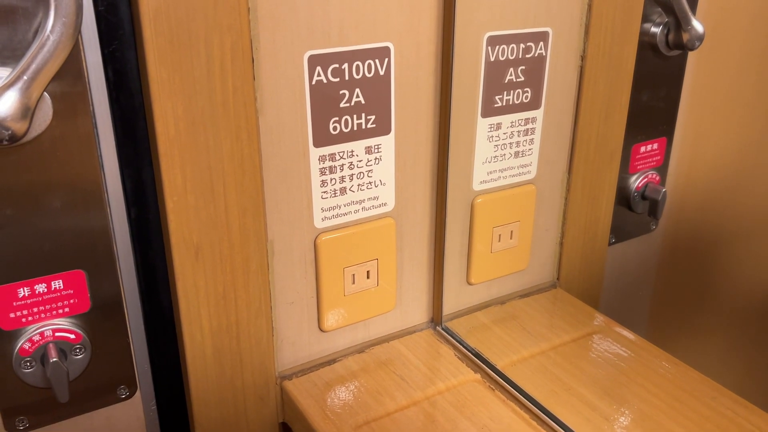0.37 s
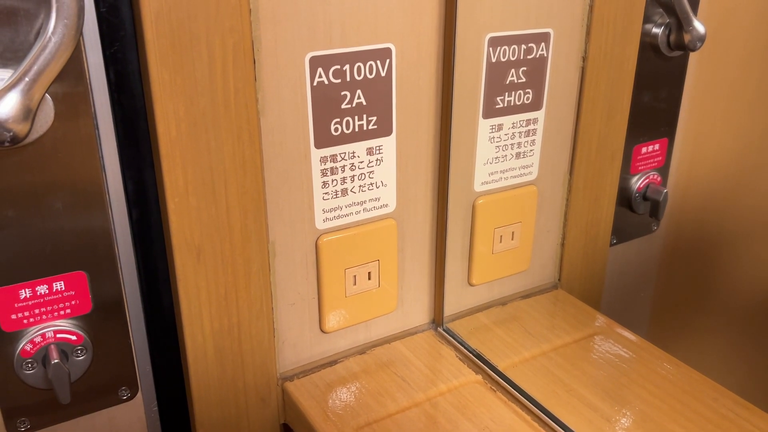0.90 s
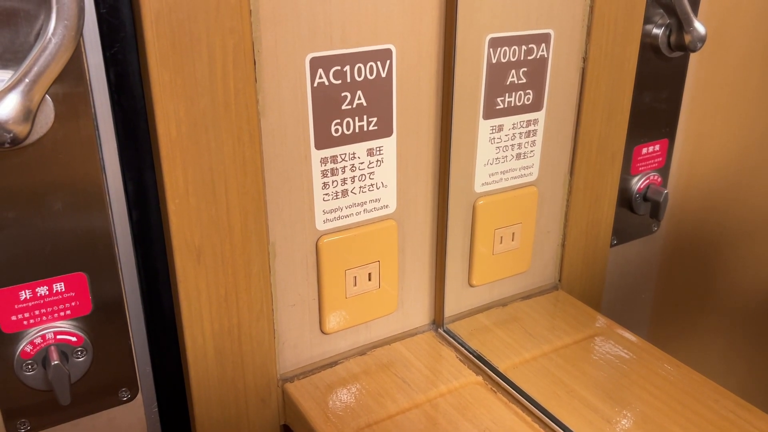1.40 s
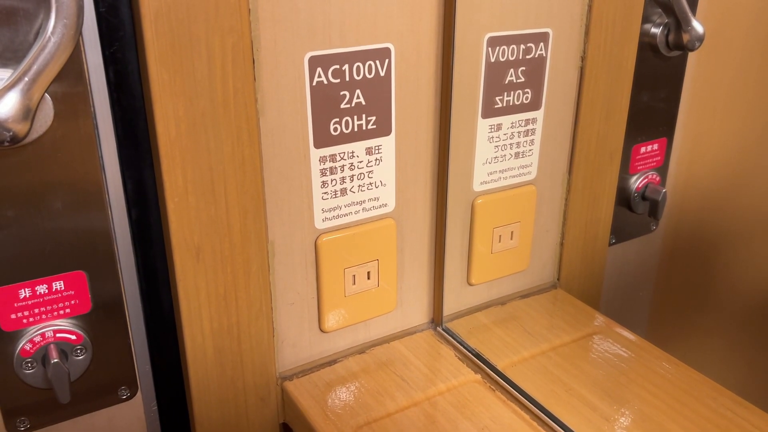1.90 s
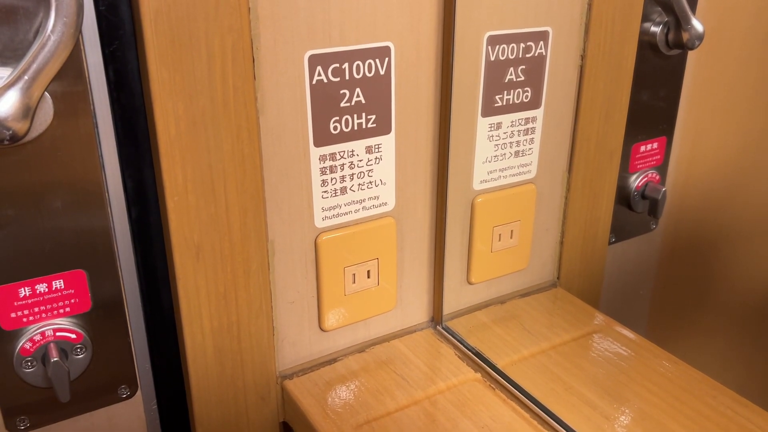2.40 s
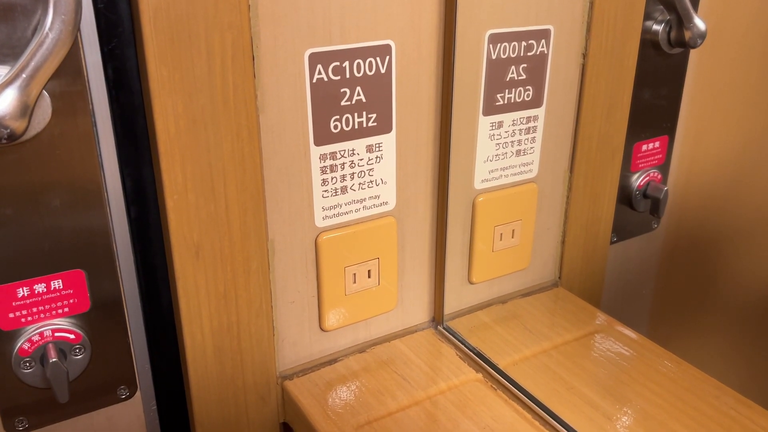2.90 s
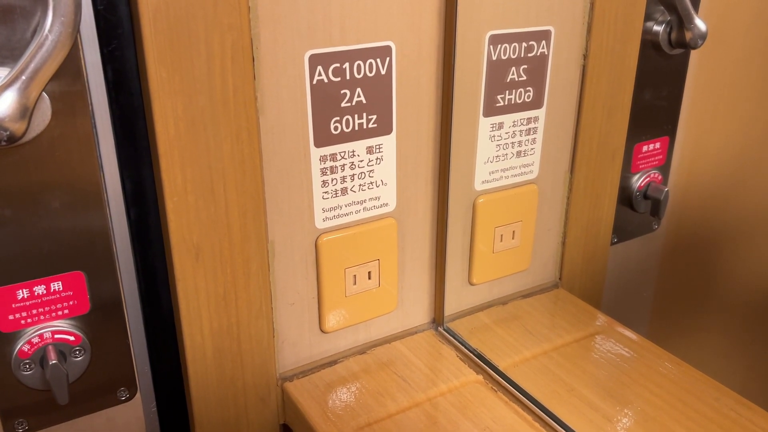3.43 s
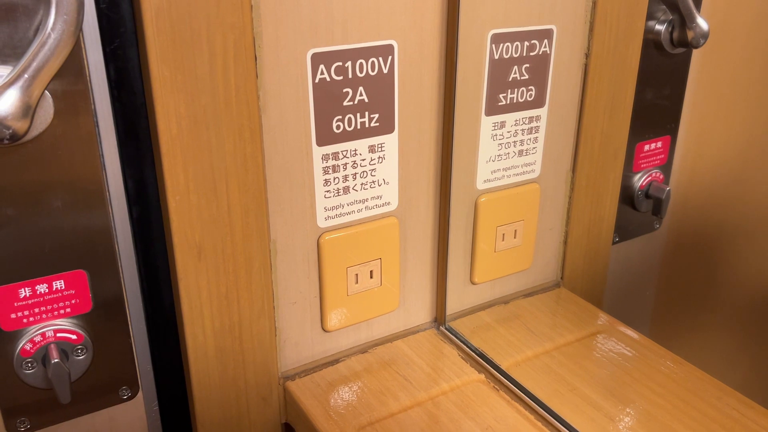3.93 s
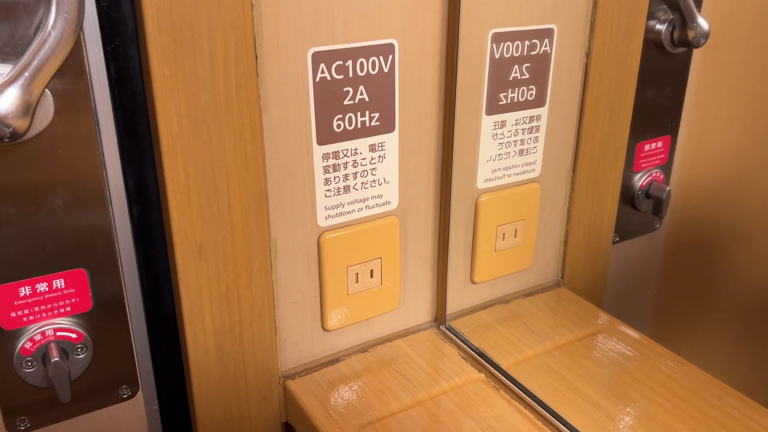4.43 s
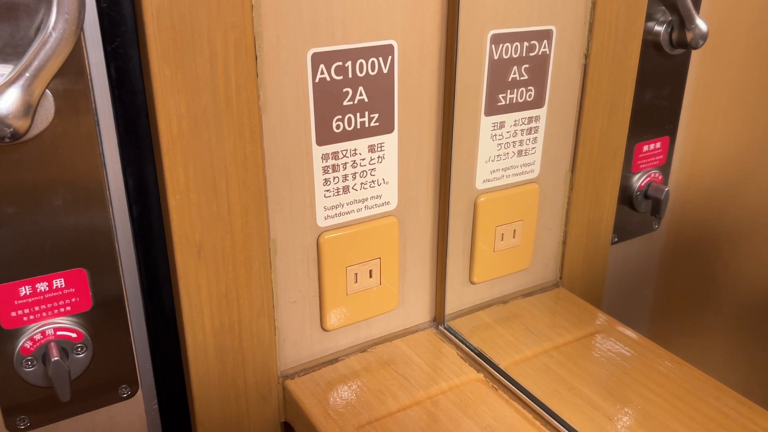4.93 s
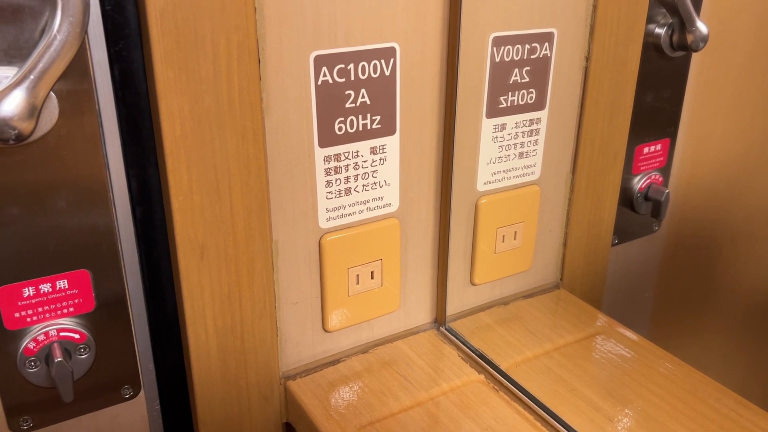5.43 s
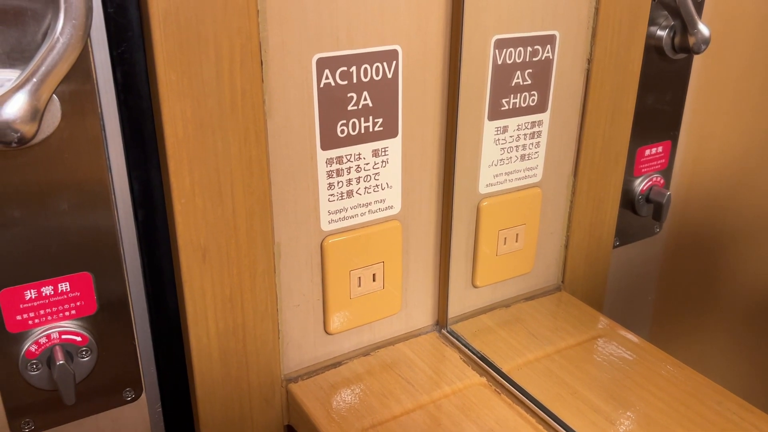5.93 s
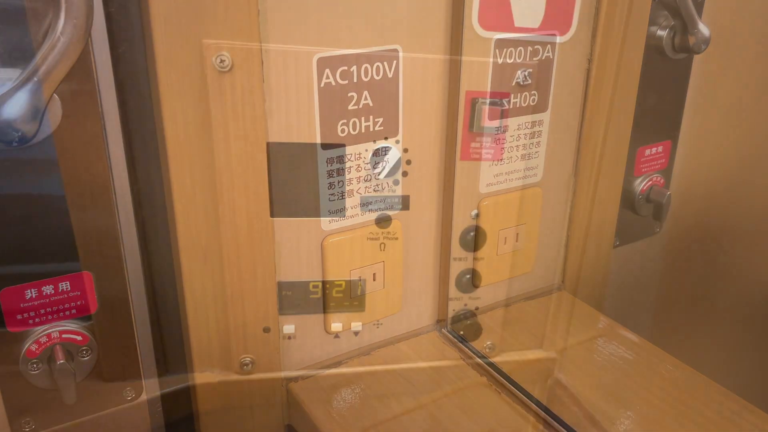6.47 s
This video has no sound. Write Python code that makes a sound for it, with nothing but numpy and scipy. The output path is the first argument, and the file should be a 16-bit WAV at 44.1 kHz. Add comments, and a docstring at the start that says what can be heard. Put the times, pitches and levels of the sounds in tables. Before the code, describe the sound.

A continuous train interior ambience, close and boxy in stereo: bassy rolling rumble swelling and sinking irregularly, a soft patchy rush of ventilation, a mid-pitched fan note leaning right, and very faint high machine tones. Nothing else happens for about six seconds; then the rumble suddenly becomes louder and rougher, the air changes colour, and it stops.

```python
"""Train compartment, rolling.

Inside a small wood-panelled compartment of a moving train, heard by two close microphone ports.
Rolling wheels shake the floor into a low rumble: shaped noise in three ranges, each with its own level.
Air rushes from the vent as patchy noise; a fan sings one wavering sine and an electric unit a thin
steady one, over fainter wandering tones. Near the end a heavier rumble and rush are abruptly mixed in."""
import sys
import numpy as np
from scipy import signal
from scipy.fft import rfft, irfft, next_fast_len
from scipy.io import wavfile
from scipy.ndimage import uniform_filter1d

SR = 44100
rng = np.random.default_rng(int(sys.argv[2]) if len(sys.argv) > 2 else 0)


def level_to_linear(level):
    """Convert decibel levels to linear amplitude factors, elementwise."""
    exponent = np.asarray(level, float) / 20
    return 10 ** exponent


def output_pcm(signal):
    """Save a mono or channel-first signal as 16-bit PCM at the path in sys.argv[1].

    Samples are clipped to [-1, 1] before scaling.
    """
    pcm = np.clip(np.atleast_2d(signal).T, -1, 1) * 32767
    wavfile.write(sys.argv[1], SR, np.round(pcm).astype(np.int16))


N = 290178
SIZE = next_fast_len(N + SR // 2)  # transform length, with room for the reverberation
HZ = np.maximum(np.arange(SIZE // 2 + 1) * SR / SIZE, 1)

# uneven level of the rolling rumble in three ranges:
# (time [s], low range [dB], middle range [dB], upper range [dB])
ROLLING_LEVELS = [(0, -26.5, -37.5, -40.5), (.25, -32, -39.5, -43), (.45, -32.5, -33, -40.5),
                  (.8, -30, -36, -42), (1.15, -34, -35, -42), (1.38, -29, -31, -41.5),
                  (1.52, -35, -33, -43.5), (1.7, -33.5, -37, -41.5), (1.92, -31, -31.5, -42.5),
                  (2.2, -31, -35.5, -43), (2.4, -30.5, -40, -41.5), (2.58, -28.5, -31, -41.5),
                  (2.77, -29, -35, -44), (2.92, -29.5, -37.5, -41), (3.2, -31.5, -32.5, -42),
                  (3.5, -31, -36.5, -43), (3.8, -29.5, -32.5, -42.5), (4.0, -32, -33.5, -42),
                  (4.2, -32, -37, -42), (4.45, -27, -35.5, -42.5), (4.6, -35.5, -39.5, -41),
                  (4.9, -32, -31.5, -43.5), (5.15, -34.5, -38, -41.5), (5.35, -29.5, -38, -42.5),
                  (5.6, -32.5, -36, -43.5), (5.9, -29, -33, -43), (6.02, -32.5, -36.5, -42.5),
                  (6.58, -35, -34.5, -46)]
# colour of the rolling rumble: (frequency [Hz], relative density [dB per Hz])
ROLLING_SPECTRUM = [(12, -39.5), (20, -21), (28, -11), (40, -2.5), (62, 1), (100, -4), (140, -14.5),
                    (200, -19.5), (300, -30), (500, -47), (900, -76.5)]
# balance of the ports for rolling and vent: (frequency [Hz], left minus right [dB])
PORT_BALANCE = [(25, -1.8), (60, -2.3), (115, -2.2), (200, -1.5), (380, -0.8), (700, -.3), (1290, 0),
                (2000, -3.7), (4400, -1), (5500, 3), (7000, -2), (8200, 0.5), (10000, 1), (15000, 0.5)]


def rolling(response):
    """The rolling wheels' low rumble as shaped noise, its upper range the least even."""
    return rumble(in_time(ROLLING_LEVELS), ROLLING_SPECTRUM, response, PORT_BALANCE,
                  steady=[.9, .8, .3], window_s=.045)


# uneven level of the heavier rumble in three ranges:
# (time [s], low range [dB], middle range [dB], upper range [dB])
HEAVY_LEVELS = [(6.05, -24, -32, -39), (6.11, -25.5, -25, -36), (6.16, -26, -32.5, -35.5),
                (6.23, -22, -23, -40), (6.284, -33, -28, -37.5), (6.316, -19, -27.5, -37.5),
                (6.348, -22.5, -19.5, -32.5), (6.378, -26.5, -33, -39.5), (6.41, -22, -20, -36),
                (6.435, -26, -33, -44.5), (6.466, -35, -32, -34), (6.51, -26, -24, -37.5),
                (6.55, -21.5, -25.5, -38.5), (6.58, -21, -23, -42)]
# colour of the heavier rumble: (frequency [Hz], relative density [dB per Hz])
HEAVY_SPECTRUM = [(12, -53), (22, -20), (32, 2.5), (42, 2.5), (60, -3), (100, -1.5), (160, -12), (220, -23),
                  (300, -28.5), (430, -36.5), (600, -57), (900, -73)]
# balance of the ports for the heavier rumble and rush: (frequency [Hz], left minus right [dB])
HEAVY_BALANCE = [(40, 0), (110, -.3), (150, -3), (260, -5), (400, -1), (550, 3), (900, 0), (1800, -3),
                 (4400, 0), (6500, 4), (7600, 0), (8600, 8), (10000, 0)]


def heavy_rumble(response):
    """A second, heavier-sounding rumble of shaped noise, mixed in abruptly near the end."""
    noise = rumble(in_time(HEAVY_LEVELS), HEAVY_SPECTRUM, response, HEAVY_BALANCE,
                   steady=[.9, .9, .8], window_s=.04)
    return joining()[0] * noise


def rumble(levels_db, spectrum, response, balance, steady, window_s):
    """Three ranges of low noise, each with a level of its own and steadier than free noise."""
    part = np.searchsorted([75, 135], HZ)  # Hz where the middle and upper ranges begin
    span = round(window_s * SR)
    out = 0
    for k, level_db in enumerate(levels_db):
        noise = rfft(rng.standard_normal(SIZE))
        band = unit(heard(noise, spectrum, response, balance) * (part == k))
        power = band.mean(axis=0) ** 2
        swell = uniform_filter1d(uniform_filter1d(power, span), span)
        band = band * (swell + 0.17) ** (-steady[k] / 2)  # chance swells are partly levelled
        out = out + level_to_linear(level_db) * band / band.mean(axis=0).std()
    return out


# colour of the vent air: (frequency [Hz], relative density [dB per Hz])
VENT_SPECTRUM = [(200, -16.5), (400, -2), (640, -7.5), (900, -7), (1200, -3), (1700, -5.5), (1800, -8),
                 (2300, -12), (3500, -14), (4500, -18), (5000, -20), (6800, -28), (7300, -35), (15000, -36)]


def vent(response):
    """Turbulent air rushes from the vent as broad shaped noise."""
    return rush(-52.5, VENT_SPECTRUM, response, PORT_BALANCE)


# colour of the heavier rush: (frequency [Hz], relative density [dB per Hz])
HEAVY_RUSH_SPECTRUM = [(200, -4), (450, -1.5), (650, -1), (1200, -0.5), (2200, -3.5), (2800, 0), (3300, -7),
                       (4200, -11), (6500, -18), (7600, -41.5), (8600, -21), (9600, -20), (11000, -39.5),
                       (15000, -34)]


def heavy_rush(response):
    """A second, differently coloured air noise joins with the heavier rumble."""
    return joining()[0] * rush(-56, HEAVY_RUSH_SPECTRUM, response, HEAVY_BALANCE)


def rush(level_db, spectrum, response, balance):
    """Air noise that breathes a little; level_db is set ahead of the patchiness."""
    air = heard(rfft(rng.standard_normal(SIZE)), spectrum, response, balance)
    breath_db = .5 * drift(7.0)
    return level_to_linear(level_db + breath_db) * patchy(unit(air))


# how patchy the air is: (frequency [Hz], share of the swells added again [0-1])
PATCHINESS = [(500, 0.07), (1200, 0.04), (2200, 0.2), (4500, 0.5), (7000, .28), (13000, .2)]


def patchy(air):
    """Each narrow range's own swells and sinkings are deepened, alike at both ports."""
    patch_s = .045
    hz, s, parts = signal.stft(air, SR, nperseg=1024, noverlap=768)
    power = np.abs(parts.mean(axis=0)) ** 2 + 1e-20
    swell = uniform_filter1d(power, round(patch_s / (s[1] - s[0])), axis=1)
    swell = swell / power.mean(axis=1, keepdims=True)
    at, share = np.transpose(PATCHINESS)
    share = np.interp(np.log(hz + 1), np.log(at), share)
    deepened = parts * swell ** (share[:, None] / 2)
    return signal.istft(deepened, SR, nperseg=1024, noverlap=768)[1][:, :N]


# fan speed heard as its note: (time [s], pitch [Hz])
FAN_NOTE = [(0, 693.3), (.37, 695.3), (1.2, 695), (2.35, 692), (2.75, 694), (3.17, 699), (3.5, 699.4),
            (3.9, 698.3), (4.32, 697.2), (4.7, 698), (5.2, 698), (5.52, 696), (5.75, 699.4), (6.2, 698.5),
            (6.58, 697.5)]
# the fan note swells and sinks: (time [s], level change [dB])
FAN_SWELLS = [(0, 0), (.5, 2.5), (1.2, 0.5), (1.8, 1.5), (2.4, -1.5), (3.4, 1.5), (3.9, 1.5), (4.5, 0.5),
              (5.25, 1), (5.55, 0), (5.85, 0.5), (6.58, 3)]


def fan():
    """The blade note wanders a little in pitch and flutters in the air stream."""
    steady_hz = in_time(FAN_NOTE)[0]
    hz = steady_hz + .5 * drift(4.0)
    phase = 2 * np.pi * np.cumsum(hz) / SR
    joined, since_s = joining()
    # left and right port throughout
    level_db = np.c_[[-60, -54.5]]
    # dB per Hz around the middle pitch, as the note slides along a cabin mode
    slide_db = np.outer([-0.4, 0.5], steady_hz - 698)
    # with the heavier rumble the note jumps (dB), then drifts (dB per s)
    jump_db = np.outer([5.5, -2], joined)
    drift_db = np.outer([-1, -14.5], since_s)
    flutter_db = 1.3 * drift(13.0) + in_time(FAN_SWELLS)[0]
    gain = level_to_linear(level_db + slide_db + jump_db + drift_db + flutter_db)
    return np.sqrt(2) * gain * np.sin(phase + [[1.2], [0]])  # left leads, radians


def whine():
    """The electric unit's steady sine, out of step between the ports, rises with the heavier rumble."""
    pitch_hz, rise_db = 1846.6, 3
    phase = 2 * np.pi * pitch_hz * np.arange(N) / SR
    level_db = np.c_[[-73.5, -66.5]] + rise_db * joining()[0]  # left, right
    return np.sqrt(2) * level_to_linear(level_db) * np.sin(phase + [[2.2], [0]])  # left leads, radians


# faint machine tones: (middle pitch [Hz], left level [dB], right level [dB])
MACHINE_TONES = [(2880, -76, -77), (3365, -79, -79), (5298, -85, -85)]


def tones():
    """Thin notes of small machines each wander and flutter alone, and rise with the heavier rumble."""
    wander_hz, flutter_db, rise_db = 7, 3, 4
    out = 0
    for hz, left_db, right_db in MACHINE_TONES:
        phase = 2 * np.pi * np.cumsum(hz + wander_hz * drift(6.0)) / SR
        lead = np.interp(hz, *np.transpose(PORT_LEAD))
        level_db = np.c_[[left_db, right_db]] + flutter_db * drift(5.0) + rise_db * joining()[0]
        out = out + np.sqrt(2) * level_to_linear(level_db) * np.sin(phase + [[lead], [0]])
    return out


# cabin resonances (+) and nulls (-): (frequency [Hz], width [Hz], left [dB], right [dB])
CABIN_MODES = [(64, 19, 3, 2.5), (91, 20, 2.5, 2), (121, 12, 5, 5.5), (138, 19, -5.5, -5.5),
               (160, 16, 5.5, 5), (184.3, 21, 2.5, 2), (203.5, 12, -2.5, -4), (226, 16, 2.5, 1),
               (246.6, 11, -2.5, -3.5), (265, 20, 3, 5.5), (330, 37, -9, -1), (358, 20, 6, 6.5),
               (433, 36, 6.5, 2), (530, 28, 7, -4), (478, 30, -2, -2), (600, 25, 2, 2), (632, 45, -4.5, 0),
               (676, 20, -3, -3), (721, 45, 5.5, 8), (854, 16, -4, -4), (920, 40, -1.5, 1),
               (980, 20, -3, -3), (1018, 25, 7.5, 7.5), (1090, 25, -3, -3), (1139, 34, 8, 5.5),
               (1169, 25, -9, -5.5), (1225, 50, 5.5, 4.5), (1322, 15, -3, -3), (1355, 41, -3, -2.5),
               (1433, 62, 5, 6.5), (1506, 22, -5.5, -3), (1640, 25, 3.5, 4.5), (1725, 39, 0, 3),
               (1770, 25, -4.5, -5), (1820, 25, -4, -4), (1960, 40, 3, 2), (2160, 45, 4, 3),
               (2320, 40, 3, 2), (2390, 50, -3, -3), (2490, 40, -3, -5), (2750, 130, -2.5, -4),
               (3250, 70, 4, 2), (3643, 40, 2.5, 2.5), (3745, 40, -3, -3), (2538, 35, 4.5, 3.5),
               (2882, 60, 7, 6.5), (3060, 50, 4, 4), (4170, 70, 3, 3), (2985, 50, -3, -3),
               (3130, 50, -3, -2), (3365, 45, 6, 6), (3465, 45, -4, -5), (4260, 90, -2.5, -3),
               (4410, 60, 2, 2), (4480, 35, 2.5, 2.5), (5100, 50, 2, 2), (5470, 60, -4, -4),
               (5285, 85, 6.5, 5.5)]
# treble colour of the ports, a deep dip near ten kilohertz: (frequency [Hz], gain [dB])
PORT_COLOUR = [(8400, -1.5), (9300, -5), (9700, -3.5), (10400, -12.5), (10900, -4.5), (11300, -4),
               (12200, -1.5), (14800, -5), (15300, -13)]


def cabin():
    """Response at each port: the named modes, times a direct path plus a dense dying reverberation."""
    t60_s, room_db, from_hz, to_hz = .1, -12, 2000, 6500
    shape_db = over_hz(PORT_COLOUR)
    for hz, width, left_db, right_db in CABIN_MODES:
        shape_db = shape_db + np.outer([left_db, right_db], 1 / (1 + (2 * (HZ - hz) / width) ** 2))
    t = np.arange(SR // 2) / SR
    tail = rng.standard_normal((2, len(t))) * level_to_linear(-60 * t / t60_s)
    tail = rfft(tail / np.sqrt(np.sum(tail ** 2, axis=1, keepdims=True)), SIZE)
    # low down the modes are few and named; high up the bedding swallows the tail
    wet = level_to_linear(room_db) / np.sqrt((1 + (from_hz / HZ) ** 6) * (1 + (HZ / to_hz) ** 8))
    return level_to_linear(shape_db) * (1 + wet * tail) / np.sqrt(1 + wet ** 2)


# how alike the ports hear a noise: (frequency [Hz], shared part of the power [0-1])
PORT_LIKENESS = [(12, 1), (40, .999), (100, 0.994), (140, .99), (170, 0.92), (330, 0.86), (420, 0.34),
                 (690, 0.3), (750, 0.65), (850, 0.45), (1200, 0.76), (2000, 0.52), (4000, 0.52),
                 (7000, 0.55), (9000, 0.4), (9800, 0.55), (10900, 1), (12000, 0.33), (13000, 0.84),
                 (14200, 0.78), (15000, .8)]
# how far the left port is ahead: (frequency [Hz], phase lead [radians])
PORT_LEAD = [(0, 0), (1640, .8), (2150, 3.9), (2840, 2.9), (4130, 6.6), (4480, 6.4), (4740, 8.5),
             (6460, 12.6), (7840, 12.3), (9400, 9.5), (10800, 9.4), (11300, 8.1), (12500, 6.35),
             (14300, 6.2), (15200, 4.4)]


def heard(shared, spectrum, response, balance):
    """Colours a noise and brings it to the two ports, which also hear some noise of their own."""
    own = rfft(rng.standard_normal((2, SIZE)))
    alike = over_hz(PORT_LIKENESS)
    half_turn = np.exp(.5j * np.interp(HZ, *np.transpose(PORT_LEAD)))
    ports = np.sqrt(alike) * shared * [half_turn, 1 / half_turn] + np.sqrt(1 - alike) * own
    colour_db = over_hz(spectrum) + np.outer([.5, -.5], over_hz(balance))
    return ports * response * level_to_linear(colour_db)


def unit(ports):
    """Spectra back to time; the mean of both ports has rms 1."""
    out = irfft(ports, SIZE)[:, :N]
    return out / out.mean(axis=0).std()


def joining():
    """Share of the heavier sound (a 15 ms rise from 6.05 s) and the seconds since it came."""
    since_s = np.maximum(np.arange(N) / SR - 6.05, 0)
    return np.minimum(since_s / .015, 1), since_s


def in_time(rows):
    """Columns of a table as curves, one value a sample."""
    s, *columns = np.transpose(rows)
    return np.array([np.interp(np.arange(N) / SR, s, c) for c in columns])


def over_hz(points):
    """A short spectrum joined on a log-frequency axis."""
    hz, value = np.transpose(points)
    return np.interp(np.log(HZ), np.log(hz), value)


def drift(rate_hz):
    """Slow chance of spread 1: coarse noise twice through a one-pole low-pass."""
    hop = 40  # samples between coarse values
    r = np.exp(-2 * np.pi * hop * rate_hz / SR)
    noise = rng.standard_normal(N // hop + 2002)
    slow = signal.lfilter([1], [1, -2 * r, r * r], noise)[2000:]  # settled part only
    return np.interp(np.arange(N) / hop, np.arange(len(slow)), slow / slow.std())


def scene():
    """All sounds together, the heavier pair mixed in near the end, with a 4 ms fade at the very end."""
    response = cabin()
    rumbles = rolling(response) + heavy_rumble(response)
    air = vent(response) + heavy_rush(response)
    notes = fan() + whine() + tones()
    fade = np.minimum(np.arange(N)[::-1] / (.004 * SR), 1)
    return fade * (rumbles + air + notes)


def band_limit(x):
    """A steep low-pass at the top of the band."""
    return signal.sosfilt(signal.butter(12, 15610, fs=SR, output="sos"), x)


def record(dry):
    """Hands on the finished mix of both ports."""
    return band_limit(dry)


dry = scene()
out = record(dry)
output_pcm(out)
```